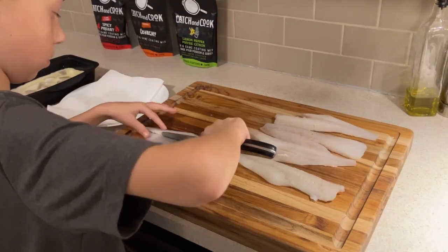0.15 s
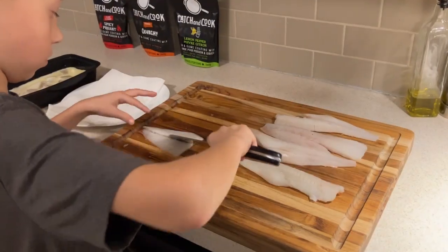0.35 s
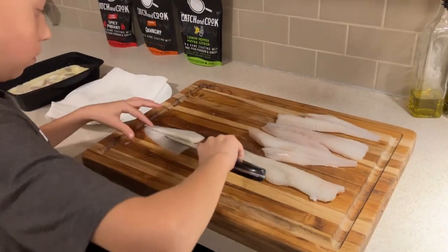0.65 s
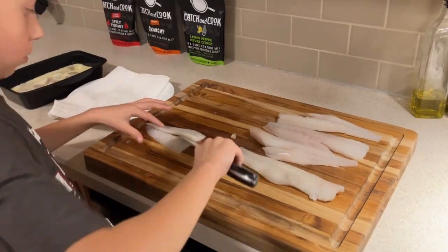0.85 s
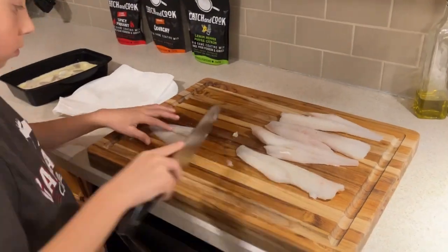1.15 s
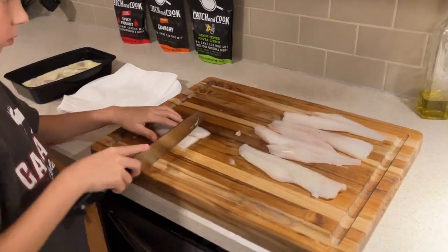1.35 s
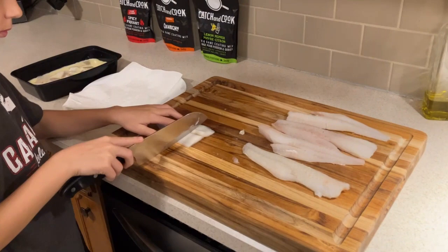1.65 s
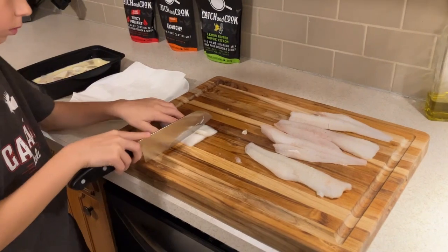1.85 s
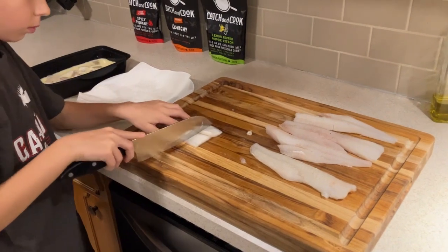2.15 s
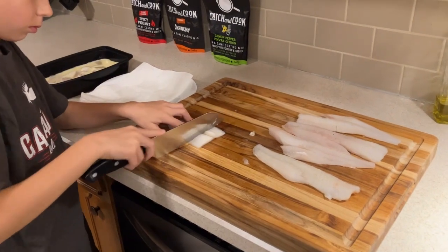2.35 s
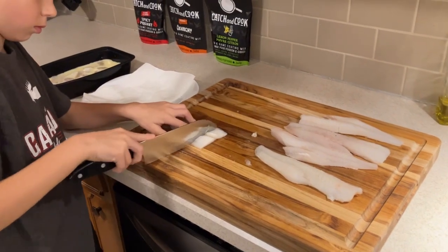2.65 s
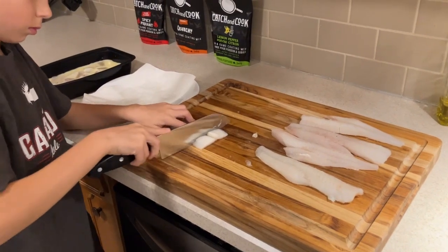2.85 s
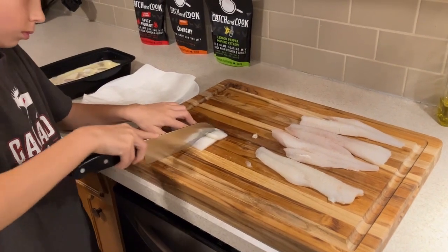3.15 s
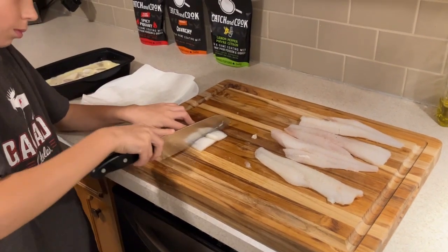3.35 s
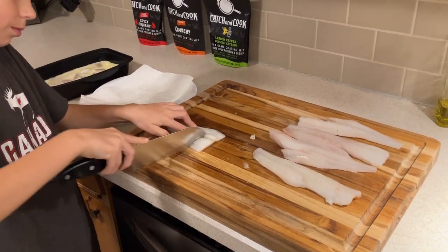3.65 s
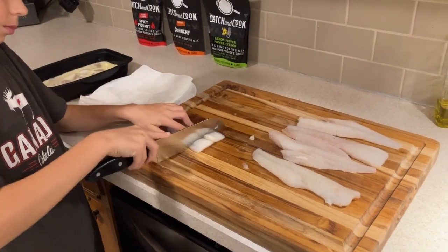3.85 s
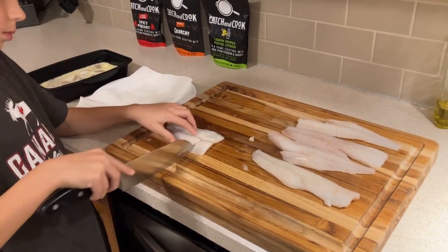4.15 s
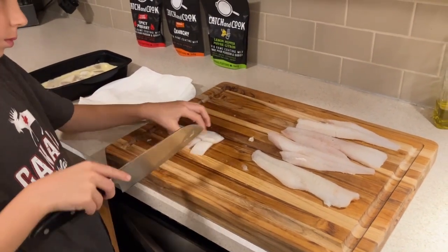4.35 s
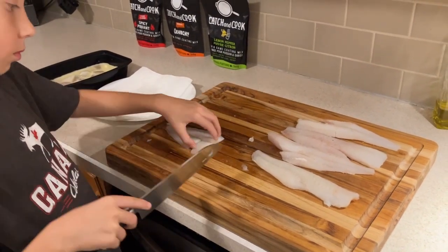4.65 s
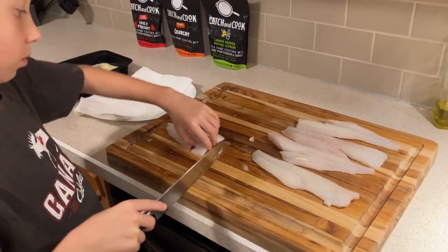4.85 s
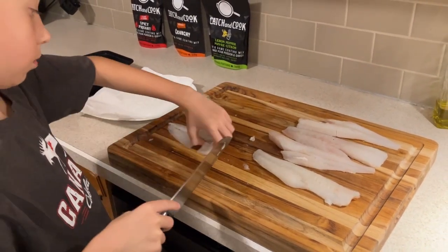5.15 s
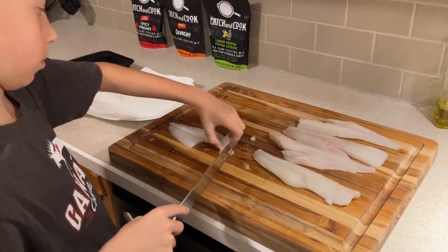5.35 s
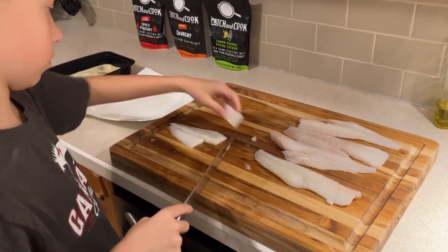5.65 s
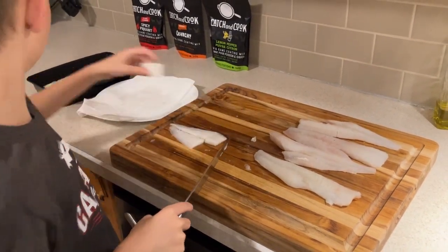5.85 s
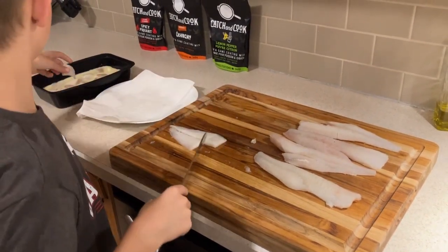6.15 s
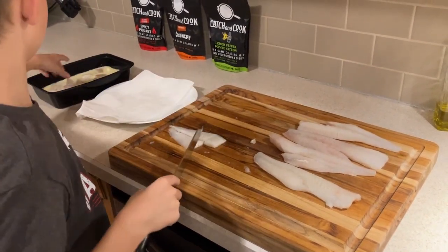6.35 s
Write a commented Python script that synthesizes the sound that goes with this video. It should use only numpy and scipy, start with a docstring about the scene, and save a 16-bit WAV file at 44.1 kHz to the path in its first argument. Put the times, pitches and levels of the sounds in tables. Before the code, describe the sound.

In a small kitchen, a knife blade slides under a soft fish fillet with several short, faintly ringing scrapes and dull nudges on a wooden board. After a lull, the edge saws back and forth with wet crackles and a few sharp taps. Fingers then rub softly on the wet wood. The knife work sounds close and quiet, over room rumble and a low hum that rises and sinks.

```python
"""In a small kitchen, a chef's knife works a soft fish fillet on a thick wooden board.
The flat blade scrapes under the fillet, the edge saws a piece off and taps the wood, and wet fingers
lift the piece. The scraping is many tiny catches and slips that make the steel ring and the wood rasp.
Behind it, a low hum glides up and sinks again over the room's rumble and a thin electrical whine."""
import sys
import numpy as np
from scipy import signal
from scipy.fft import rfft, irfft, next_fast_len
from scipy.io import wavfile

SR = 44100
rng = np.random.default_rng(int(sys.argv[2]) if len(sys.argv) > 2 else 0)


def unload_wav(signal):
    """Save mono or channel-first audio to the path in sys.argv[1] as 16-bit WAV at rate SR, clipped to [-1, 1]."""
    wavfile.write(
        sys.argv[1],
        SR,
        np.round(np.clip(np.atleast_2d(signal).T, -1, 1) * 32767).astype(np.int16),
    )


N = 287532
T = np.arange(N) / SR
PADDED = next_fast_len(N + 1000, real=True)
FREQ = np.maximum(np.fft.rfftfreq(PADDED, 1 / SR), 1)


# Strokes of the flat blade. Each row: start of full pressure in seconds, seconds held, base level in dB,
# swell while held in dB, fade-in in dB per second, extra wood rasp in dB, extra wet sizzle in dB.
FLAT_STROKES = [(0.0, 0.01, -69.5, -14, 300, 8.5, -4), (.145, 0.084, -73, 0, 297, -2, -1),
                (.408, 0.062, -73.5, -2.5, 330, -3, -2.5), (.705, 0.042, -72.5, 1.5, 138, 1, 0.5),
                (.908, 0.034, -65.5, 2, 350, -3.5, -2.5), (1.12, 0.1, -82.5, -2.5, 150, 4.5, -6)]
def flat_blade():
    """The flat of the blade slides under the fillet in a fine stream of slips."""
    friction = slips(per_s=4000, scatter_db=1.5, smooth=1.0)
    return strokes(FLAT_STROKES, friction, release_db_per_s=229, blade_db=2, hiss_db=-5,
                   wet_db=4, wood_db=1.3, judder_db=1.2, wood_fade_ratio=0.84)


# Strokes of the edge, back and forth. Each row reads like a row of FLAT_STROKES.
SAW_STROKES = [(2.67, 0.022, -77, -1, 250, 3, 0.46), (2.897, .016, -60.5, -1, 240, -1, -1),
               (3.108, .038, -60, -0.5, 330, -0.5, -1.7), (3.328, 0.047, -59, 1, 156, 0, 1.94),
               (3.505, 0.12, -60.5, 1.5, 795, -0.5, 2.04), (3.755, 0.13, -61.5, 3.5, 260, 1.5, 2.5),
               (4.04, .17, -61.5, -6, 350, -7.5, 0.89)]
def sawing():
    """The edge saws through the fish, with fewer slips and less ring from the steel."""
    friction = slips(per_s=1200, scatter_db=0, smooth=0.99)
    return strokes(SAW_STROKES, friction, release_db_per_s=308, blade_db=-10, hiss_db=-2.5,
                   wet_db=2.5, wood_db=-2, judder_db=1.44, wood_fade_ratio=0.78)


# The tone of the hiss, rasp and sizzle. # Each row: frequency in Hz, relative level in dB.
HISS_TONE = [(1500, -7), (3200, 1.5), (4400, -6.5), (5400, 2), (7200, 2), (8400, 11.5), (10000, -53),
             (15000, -22)]
RASP_TONE = [(200, -4), (450, 9.5), (750, -1.5), (1050, 7.5), (1400, -3), (2100, 6), (3300, -12.5),
             (5000, -7.5), (9000, -33)]
SIZZLE_TONE = [(5000, -55), (8500, -32), (10000, 7.5), (11600, 3.5), (13500, 5), (15500, 6.5)]
def strokes(table, friction, release_db_per_s, blade_db, hiss_db, wet_db, wood_db, judder_db,
            wood_fade_ratio):
    """Friction hisses at the edge, rings the blade, rasps in the wood grain and tears tiny wet fibres."""
    # part of each slip is heard raw, the rest through the changing contact
    drive = unit(.6 * friction + unit(shifting_contact(friction)))
    hiss = undb(hiss_db) * unit(colour(drive, HISS_TONE))
    blade = undb(blade_db) * unit(steel(drive))
    wood = undb(wood_db) * unit(colour(drive, RASP_TONE))
    sizzle = undb(wet_db) * unit(colour(drive, SIZZLE_TONE))
    out = np.zeros(N)
    for start, held, db, swell_db, attack, rasp_db, sizzle_db in table:
        force = pressure(start, held, db, swell_db, attack, release_db_per_s)
        out += force * (hiss + blade + undb(sizzle_db) * sizzle)
        # the wood rasps under light pressure too, so it starts sooner and lingers
        wood_fades = wood_fade_ratio * attack, wood_fade_ratio * release_db_per_s
        out += pressure(start, held, db + rasp_db, swell_db, *wood_fades) * wood
    return out * undb(judder_db * wander(90))


def slips(per_s, scatter_db, smooth):
    """Surfaces catch and let go: tiny clicks of uneven size over a smooth hiss."""
    count = int(per_s * T[-1])
    size, spread = rng.standard_normal((count, 2)).T
    clicks = np.bincount(rng.integers(0, N, count), size * undb(scatter_db * spread), N)
    return unit(unit(clicks) + smooth * noise())


def pressure(start, held, db, swell_db, attack_db_per_s, release_db_per_s):
    """The loudness of one stroke: it builds, the hand leans in or eases off, then lets go."""
    lean_db = swell_db * (np.clip((T - start) / held, 0, 1) - .5)
    before_db = attack_db_per_s * np.maximum(start - T, 0)
    after_db = release_db_per_s * np.maximum(T - start - held, 0)
    return undb(db + lean_db - np.minimum(before_db + after_db, 100))


def shifting_contact(x, ring_s=.018):
    """The grip and the touching point keep changing, so ringing notes come and go."""
    hop, t = SR // 16, T[:SR // 50]
    out, fade = np.zeros(N), np.sqrt(np.hanning(2 * hop))
    for i in range(0, N - 2 * hop, hop):
        path = noise(len(t)) * np.exp(-np.log(1000) * t / ring_s)
        add(out, i / SR, signal.fftconvolve(x[i:i + 2 * hop] * fade, path / np.linalg.norm(path)))
    return out


# The notes the blade rings at. Each row: pitch in Hz, width in Hz, relative level in dB.
BLADE_NOTES = [(2640, 97, -13), (3790, 88, -12.5), (3960, 330, -2), (4480, 180, -14), (6260, 300, -9),
               (7360, 70, 3), (7290, 120, -10), (8500, 100, -2), (10120, 200, 0.5), (11220, 150, -0.5),
               (11400, 210, -10)]
def steel(x, sway_db=3):
    """The blade's notes grow and fade as the touching point travels along it."""
    return sum(undb(db + sway_db * wander(9)) * ring(x, hz, width) for hz, width, db in BLADE_NOTES)


# The edge meets the board, and at the end the knife is set down on the fish. Each row: time in seconds,
# strength in dB, brightness in Hz.
TAPS = [(2.63, -70.5, 4420), (3.485, -56.5, 8870), (3.705, -53, 4640), (4.333, -50.5, 5250),
        (6.490, -64.5, 7080)]
def taps(crack_s=0.02, skid_s=0.28, skid_db=-4, blade_db=-3, wood_db=-3):
    """The edge lands with a crack and skids briefly, sounding both steel and wood."""
    hits = np.zeros(N)
    for start, db, hz in TAPS:
        hit = burst(crack_s) + undb(skid_db) * burst(skid_s)
        add(hits, start, undb(db) * ring(hit, hz, 0.84 * hz))
    return hits + undb(blade_db) * steel(hits) + undb(wood_db) * ring(hits, hz=2000, width_hz=1200)


# Wet skin and fibres let go. Each row: time in seconds, strength in dB, pitch in Hz, seconds to die away.
SNAPS = [(2.892, -60, 10900, .058), (3.329, -49, 11450, 0.036), (3.850, -47, 12080, 0.036),
         (3.863, -46, 14100, .086), (4.053, -51, 12000, 0.054), (4.142, -51, 11600, 0.042),
         (4.171, -49, 11450, 0.041), (5.0121, -45, 13500, .007), (5.0175, -51.5, 11200, .014),
         (5.0576, -55, 11800, 0.018), (5.070, -56, 7600, .025)]
def wet_snaps(width_hz=3200):
    """Each sticky contact parts in a short, high crackle."""
    out = np.zeros(N)
    for start, db, hz, decay_s in SNAPS:
        add(out, start, 2 * undb(db) * ring_twice(burst(decay_s), hz, width_hz))
    return out


# Blade, board or wet skin catches and sings.
# Each row: middle in seconds, length in seconds, pitch in Hz, width in Hz, level in dB.
ZINGS = [(.435, .18, 3970, 120, -74), (.739, 0.16, 3630, 130, -69), (0.951, .13, 7040, 140, -69),
         (.967, 0.033, 2610, 120, -68), (2.39, .089, 1170, 262, -74), (3.278, 0.045, 2770, 248, -62.5),
         (3.344, .09, 1060, 300, -62.5), (3.549, .12, 1090, 350, -61.5), (3.72, 0.084, 4700, 350, -66),
         (4.181, 0.2, 7100, 300, -65), (4.839, 0.57, 7560, 445, -83.5), (5.378, .24, 7390, 600, -83)]
def zings():
    """Friction feeds a single ringing note, which swells and fades."""
    out = np.zeros(N)
    for middle, length, hz, width, db in ZINGS:
        n = int(length * SR)
        note = unit(ring_twice(noise(n), hz, width, widen=3))
        add(out, middle - length / 2, undb(db) * np.hanning(n) * note)
    return out


# Wet steel squeaks. Each row: start and length in seconds, first and last pitch in Hz, level in dB.
SQUEAKS = [(.007, 0.0082, 3250, 3190, -63), (0.038, 0.016, 3290, 3230, -71), (0.075, 0.01, 3280, 3200, -74),
           (4.715, .05, 7230, 7920, -69)]
def squeaks(waver=0.0036):
    """For a moment the slips fall into step and make a thin tone."""
    out, wobble = np.zeros(N), 1 + waver * wander(600)
    for start, length, first_hz, last_hz, db in SQUEAKS:
        n = int(length * SR)
        pitch_hz = np.linspace(first_hz, last_hz, n) * wobble[:n]
        add(out, start, undb(db) * np.hanning(n) * sine(pitch_hz))
    return out


# Dull pushes on the board. Each row: start in seconds, level in dB, pitch in Hz.
PUSHES = [(.005, -54.5, 339), (.17, -55, 327), (.369, -51.5, 312), (0.423, -51, 302), (.70, -52, 278),
          (1.091, -60, 330), (2.237, -51.5, 198.5), (2.859, -50, 60.5), (2.881, -57.5, 315),
          (3.28, -54, 224), (4.42, -56.5, 240)]
def board_thuds(rise_s=0.024, width_ratio=0.26):
    """Soft pushes through the fillet make the heavy board grumble."""
    out, t = np.zeros(N), T[:SR // 3]
    swell = t / rise_s * np.exp(1 - t / rise_s)
    for start, db, hz in PUSHES:
        body = unit(ring_twice(noise(len(t)), hz, width_ratio * hz))
        add(out, start, undb(db) * body * swell)
    return out


# Fingers and fillet slide. Each row: start in seconds, seconds held, level in dB, swell while held in dB.
RUBS = [(1.38, 0.16, -85, 2), (1.6, .12, -80, -1), (2.38, 0.071, -80.5, 7), (4.62, .04, -85, 0),
        (4.76, 0.22, -78, -3), (5.1, 0.42, -85.5, 3)]
def rubbing(fade_db_per_s=92, uneven_db=1.5):
    """Skin and fish rub softly on the wet wood."""
    force = sum(pressure(*row, fade_db_per_s, fade_db_per_s) for row in RUBS)
    tone_hz_db = [(300, 3), (700, 11), (1100, 0.5), (2200, -0.5), (3200, -8.5), (5200, -2),
                  (6000, -35), (7400, -4), (9000, -14.5), (15000, -9)]
    friction = slips(per_s=1600, scatter_db=-0.5, smooth=0.83)
    return unit(colour(friction, tone_hz_db)) * undb(uneven_db * wander(40)) * force


# How far the left side runs ahead of the right. Each row: frequency in Hz, phase lead in radians.
LEFT_LEAD = [(0, -0.5), (1400, -0.25), (2000, 4), (2760, 4), (3530, 6.5), (4900, 17), (5860, 15.5),
             (6550, 12.5), (11000, 7), (16000, 0.3)]
def kitchen(x, to_room, echo_s=0.19, dull_hz=9000):
    """The sound arrives a little differently left and right, then tiles and worktop ring briefly."""
    lead = np.interp(FREQ, *np.transpose(LEFT_LEAD))
    direct = irfft(rfft(x, PADDED) * np.exp(.5j * np.array([lead, -lead])))[:, :N]
    soften = signal.butter(1, dull_hz, fs=SR)
    tails = [signal.lfilter(*soften, burst(echo_s)) for _ in range(2)]
    echoes = [signal.oaconvolve(to_room, tail / np.linalg.norm(tail))[:N] for tail in tails]
    return direct + np.array(echoes)


# The hum climbs, turns and sinks. Each row: time in seconds, pitch in Hz.
HUM_PITCH = [(0.0, 49.6), (0.57, 63.3), (0.94, 70.63), (3.47, 102.4), (4.19, 109.1), (5.1, 100.2),
             (6.4, 82.2)]
# It swells and dips on the way. Each row: time in seconds, level in dB.
HUM_LEVEL = [(0.0, -56), (0.27, -43.5), (0.42, -46), (0.47, -61), (0.9, -43.5), (1.07, -55), (1.66, -42),
             (1.85, -56.5), (1.9, -50.5), (2.21, -57.5), (2.41, -49), (2.55, -54.5), (2.7, -43.5),
             (2.84, -52), (2.95, -43.5), (3.31, -45.5), (3.53, -69), (3.82, -50.5), (3.91, -58),
             (4.04, -48), (4.27, -55.5), (4.33, -70), (4.38, -51.5), (4.78, -46.5), (4.96, -51),
             (5.03, -65), (5.1, -47), (5.3, -51.5), (5.39, -45), (5.74, -53.5), (5.79, -71), (5.85, -68),
             (6.3, -68), (6.41, -56), (6.5, -57)]
def hum(right_louder_db=1.45):
    """A low, nearly pure tone glides and swells, a little to the right."""
    tone = undb(curve(HUM_LEVEL)) * sine(curve(HUM_PITCH))
    return tone * undb([[-right_louder_db / 2], [right_louder_db / 2]])


# The whine's changing loudness. Each row: time in seconds, level in dB.
WHINE_LEVEL = [(0, -92), (.5, -84.5), (1.7, -86), (2.5, -94), (4.7, -99), (6.2, -93)]
def whine(pitch_hz=10697, wander_hz=9, hiss_db=-5):
    """A thin electrical tone wavers slightly, with a faint hiss around it."""
    tone = sine(pitch_hz + wander_hz * wander(37))
    hiss = undb(hiss_db) * unit(ring(noise(), pitch_hz, width_hz=160))
    return undb(curve(WHINE_LEVEL)) * (tone + hiss)


# A low rumble and faint hiss. Each row: frequency in Hz, relative level in dB.
RUMBLE_TONE = [(25, -22.5), (42, -5), (56, 3), (85, 1.5), (135, -5.5), (170, -3), (240, -2), (280, -9),
               (340, -9.5), (480, -18), (700, -28), (1100, -34), (1600, -42), (3000, -46), (6000, -49.5),
               (7200, -47), (9000, -59), (11500, -50), (16000, -58.5)]
# How wide it sounds. Each row: frequency in Hz, level of the sides against the middle in dB.
RUMBLE_WIDTH = [(60, -10), (200, -11), (380, -7), (700, 0.5), (1300, 0), (15000, 0.5)]
def rumble(rumble_db=-55, flicker_db=1.58, drone_hz=226, drone_width_hz=12, drone_db=-62):
    """A rumble comes from all around, along with an appliance's unsteady drone."""
    middle = unit(colour(noise(), RUMBLE_TONE)) * undb(rumble_db + flicker_db * wander(11))
    sides = unit(colour(noise(), RUMBLE_TONE)) * undb(rumble_db + flicker_db * wander(11))
    drone = undb(drone_db) * unit(ring_twice(noise(), drone_hz, drone_width_hz))
    return middle + drone + colour(sides, RUMBLE_WIDTH) * np.array([[1], [-1]])


def undb(db):
    """Turn decibels into a number to multiply by."""
    return 10 ** (np.asarray(db) / 20)


def unit(x):
    """Scale a sound to an average strength (rms) of one."""
    return x / np.sqrt(np.mean(x ** 2))


def curve(table):
    """Join (seconds, value) points with straight lines."""
    return np.interp(T, *np.transpose(table))


def sine(hz):
    """A pure tone that follows a changing pitch."""
    return np.sqrt(2) * np.sin(2 * np.pi * np.cumsum(hz) / SR)


def colour(x, points):
    """Shape a sound's tone with (Hz, dB) points."""
    hz, db = np.transpose(points)
    gain = undb(np.interp(np.log(FREQ), np.log(hz), db))
    return irfft(rfft(x, PADDED) * gain)[:N]


def ring(x, hz, width_hz):
    """Keep the sound near one pitch; a narrower band rings longer."""
    return signal.lfilter(*signal.iirpeak(hz, hz / width_hz, fs=SR), x)


def ring_twice(x, hz, width_hz, widen=2):
    """Ring, then trim the edges with a second, wider band."""
    return ring(ring(x, hz, width_hz), hz, widen * width_hz)


def noise(n=N):
    """An even hiss: white noise."""
    return rng.standard_normal(n)


def wander(per_s):
    """A random drift about one in size, with per_s new values a second."""
    count = int(T[-1] * per_s) + 2
    return unit(np.interp(T * per_s, np.arange(count), noise(count)))


def burst(decay_s):
    """Noise that dies away by 60 dB in decay_s seconds."""
    t = T[:SR // 2]
    return noise(len(t)) * np.exp(-np.log(1000) * t / decay_s)


def add(out, start_s, sound):
    """Mix a sound in at a given time."""
    i = max(int(start_s * SR), 0)
    out[i:i + len(sound)] += sound[:N - i]


def scene(scrape_echo_db=-5, tap_echo_db=-1, snap_echo_db=-6):
    """Knife, fingers and board sound in the kitchen, over the hum, whine and rumble."""
    scrapes = flat_blade() + sawing() + zings() + squeaks() + rubbing()
    knocks, crackle = taps(), wet_snaps()
    to_room = undb(scrape_echo_db) * scrapes + undb(tap_echo_db) * knocks + undb(snap_echo_db) * crackle
    knife_work = kitchen(scrapes + knocks + crackle, to_room) + board_thuds()
    return knife_work + hum() + whine() + rumble()


def record(dry, top_hz=15800):
    """Cut off the very highest treble steeply."""
    return signal.sosfilt(signal.ellip(10, .2, 70, top_hz, fs=SR, output="sos"), dry)


dry = scene()
out = record(dry)
unload_wav(out)
```